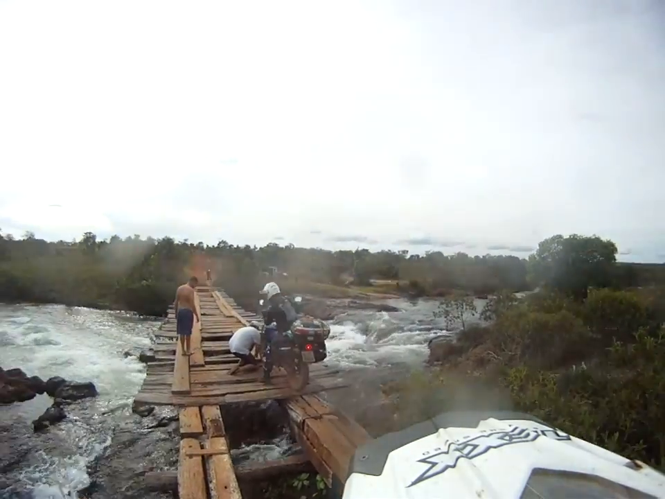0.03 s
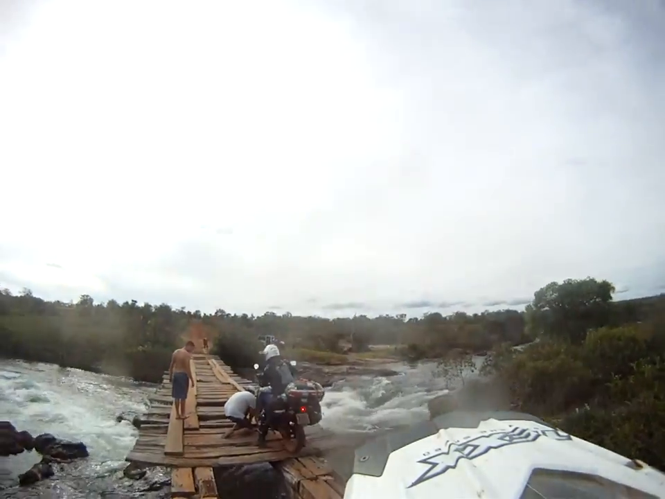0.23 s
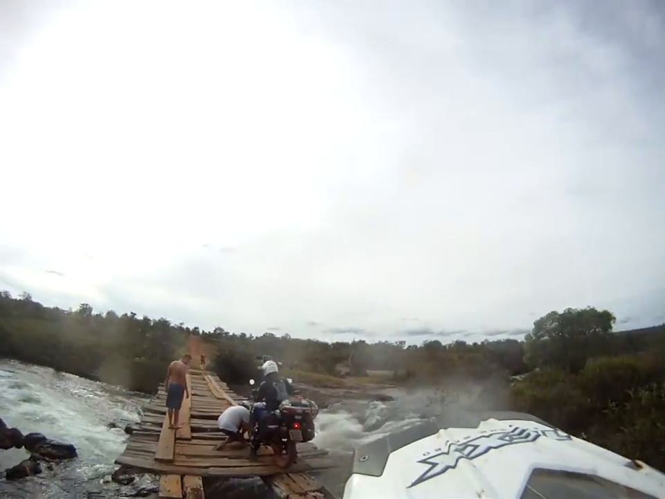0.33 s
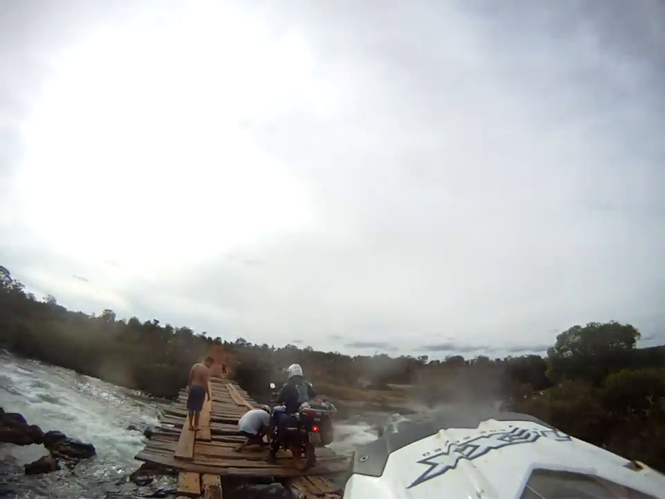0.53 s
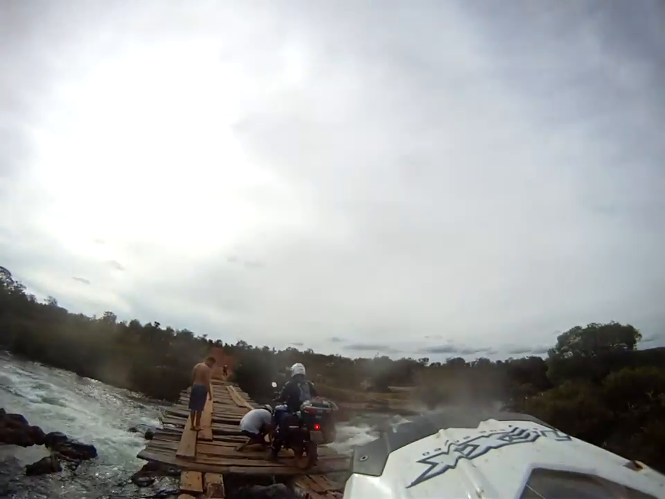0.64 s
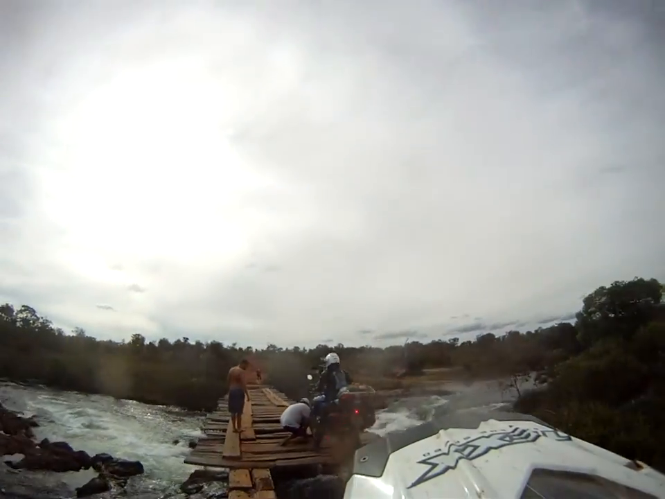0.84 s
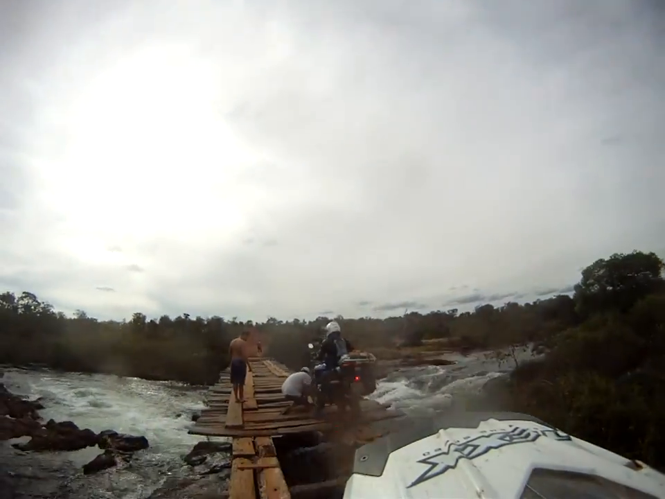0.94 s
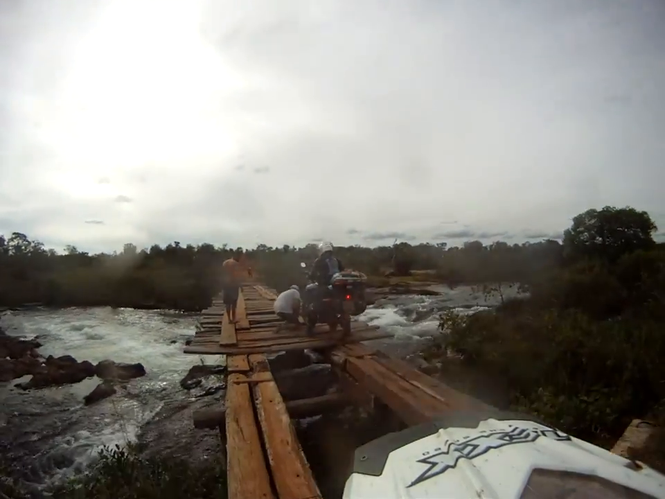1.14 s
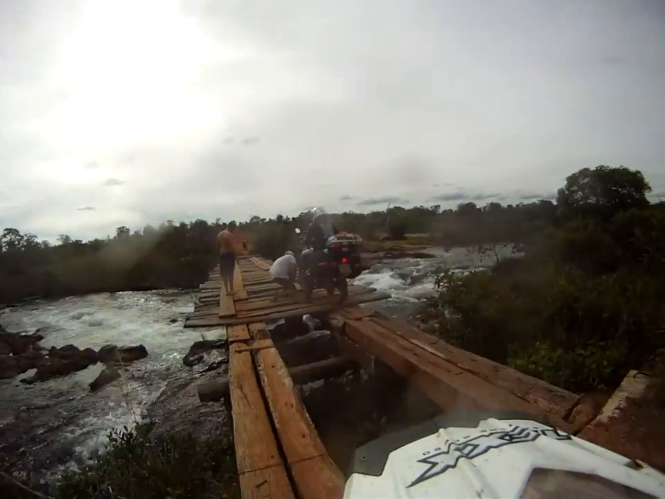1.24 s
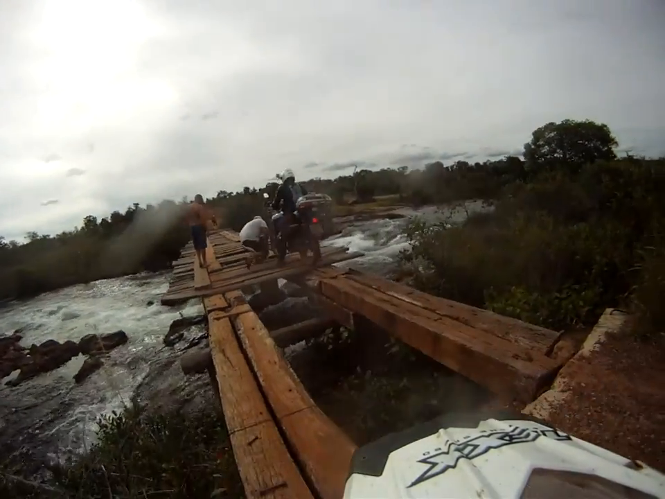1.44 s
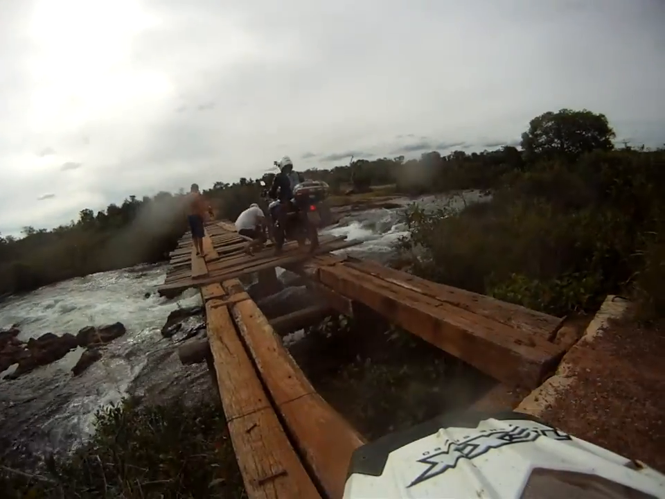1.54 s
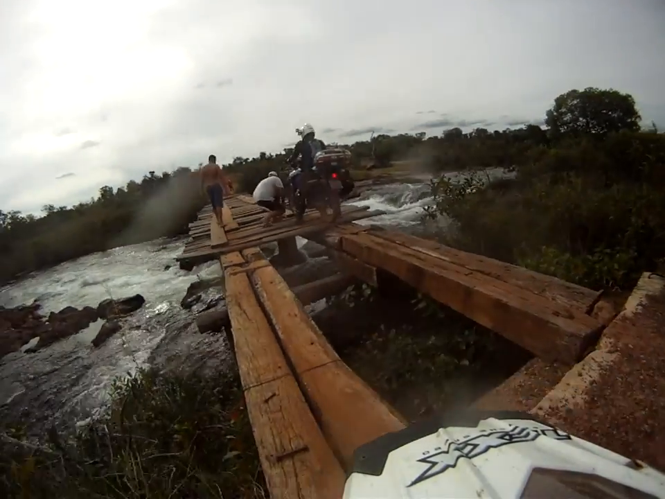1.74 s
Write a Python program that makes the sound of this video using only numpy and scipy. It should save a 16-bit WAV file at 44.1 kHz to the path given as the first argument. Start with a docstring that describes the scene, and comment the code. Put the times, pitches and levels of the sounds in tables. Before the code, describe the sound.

Short, sharp knocks from loose planks on a wooden bridge, heard close through a closed camera case. The heavier blows bring deep thumps, then faint ticks and a soft scuff follow, while a muffled river rushes steadily underneath.

```python
"""On a wooden bridge over river rapids, loose planks knock a few times close to a camera in a closed case.
Each knock clacks in the case and rings the wood; the heavier blows shake the camera's mount.
Small dry ticks and a soft scuff fall in between, over the steady rush of the water, muffled by the case.
The recorder holds each sample at a low rate, which mirrors the sound faintly into the treble."""
import sys
import numpy as np
from scipy.fft import rfft, irfft, next_fast_len
from scipy.io import wavfile
from scipy.ndimage import map_coordinates

SR = 44100
rng = np.random.default_rng(int(sys.argv[2]) if len(sys.argv) > 2 else 0)


def log_audio(samples):
    """Write samples as a 16-bit WAV file to the path given in sys.argv[1]."""
    # one column per channel
    frames = np.atleast_2d(samples).T
    # limit to full scale, then quantise
    limited = np.clip(frames, -1, 1)
    pcm = np.round(limited * 32767).astype(np.int16)
    wavfile.write(sys.argv[1], SR, pcm)


N = 79380


def amp(db):
    """Decibels to gain."""
    return 10 ** (np.asarray(db) / 20)


def unit(x):
    """Scale to rms 1."""
    return x / np.sqrt(np.mean(x ** 2) + 1e-20)


def along(points, hz):
    """Read (Hz, value) points on a log axis."""
    f, v = np.transpose(points)
    return np.interp(np.log(hz + 1), np.log(f + 1), v)


def filtered(x, response):
    """x times a response of frequency."""
    m = next_fast_len(N + 8192)
    return irfft(rfft(x, m) * response(np.fft.rfftfreq(m, 1 / SR)), m)[:N]


def noise(colour):
    """Noise of rms 1 with the given spectrum."""
    return unit(filtered(rng.standard_normal(N), lambda hz: amp(along(colour, hz))))


def wobble(rate):
    """A smooth random curve, rate knots a second."""
    return map_coordinates(rng.standard_normal(int(N * rate / SR) + 4), [np.arange(N) * rate / SR])


def since(s):
    """Seconds since s, zero before it."""
    return np.maximum(np.arange(N) / SR - s, 0)


def struck(s, attack, t60):
    """Envelope of a blow at s: quick rise, exponential fall."""
    t = since(s)
    return (1 - np.exp(-(t / attack) ** 2)) * np.exp(-np.log(1000) * t / t60)


def ring(s, hz, attack, t60):
    """One mode struck at s."""
    return np.sin(2 * np.pi * hz * since(s)) * struck(s, attack, t60)


def river():
    """A steady bed of rushing rapids, heard through the resonances of the case."""
    # muffled water (frequency [Hz], relative level [dB])
    colour = [(100, -32), (160, -7), (205, 5), (270, -12.5), (450, -7), (720, -11.5), (990, -1),
              (1180, -10.5), (1700, -7), (2100, 0.5), (2420, -0.5), (2650, -14.5), (3000, -12),
              (3700, -19.5), (5000, -21), (5700, -26), (6000, -46)]
    return amp(-46) * noise(colour)


def mount_rumble():
    """The mount never stands quite still: a deep rumble that slowly settles."""
    # tremble of the mount (frequency [Hz], relative level [dB])
    colour = [(10, -16), (27, 7.5), (45, -11), (78, -3.5), (105, -18), (135, -29), (300, -98)]
    start_db, fall_db_per_s, swing_db = -37.5, 1.5, 0.5
    level_db = start_db - fall_db_per_s * since(0) + swing_db * wobble(10.6)
    return amp(level_db) * noise(colour)


def scuff():
    """One soft, dull rub that swells and fades."""
    # rubbing noise (frequency [Hz], relative level [dB])
    colour = [(150, -15), (450, 1.5), (680, 6.5), (1200, -12), (2500, -13), (5000, -42)]
    peak_s, width_s = 1.561, 0.039
    swell = np.exp(-0.5 * ((since(0) - peak_s) / width_s) ** 2)
    return amp(-46.5) * noise(colour) * swell


def dry_ticks():
    """Small bright contacts, each a short gritty burst."""
    # light contacts (time [s], level [dB], t60 [s])
    ticks = [(0.052, -43, 0.035), (0.086, -44, 0.035), (0.1953, -38, 0.021), (.212, -42, 0.045),
             (.228, -41.5, 0.031), (.246, -48, 0.099), (.29, -41, .05), (0.3395, -21, 0.01),
             (.402, -44.5, 0.052), (0.4209, -35, 0.022), (0.461, -42.5, 0.025), (0.51, -43, 0.11),
             (0.572, -48, 0.033), (0.6028, -33.5, 0.035), (.618, -43, 0.024), (0.939, -39, 0.033),
             (0.944, -38, 0.022), (1.281, -51, 0.045), (1.303, -47, 0.026), (1.332, -33, 0.024),
             (1.345, -45, 0.046), (1.374, -47, 0.11), (1.601, -37, 0.0091), (1.705, -35.5, .014),
             (1.72, -46, 0.038)]
    # bright tick noise (frequency [Hz], relative level [dB])
    colour = [(500, -38), (2900, -10.5), (3600, 7.5), (4100, -4), (5000, -8), (5900, -18)]
    grain_db, grains_per_s = 4, 900
    grit = unit(noise(colour) * amp(grain_db * wobble(grains_per_s)))
    return grit * sum(amp(db) * struck(s, attack=0.00036, t60=t60) for s, db, t60 in ticks)


def mount_jolts():
    """Each jolt sets the mount swaying, with a low thud just behind."""
    # jolts of the mount (time [s], thud level [dB], sway level [dB])
    jolts = [(0.073, -34.5, -56.5), (.178, -30.5, -52), (0.343, -27, -58), (.438, -25.5, -63),
             (0.6304, -20.5, -20), (0.702, -23.5, -19), (.893, -22, -34), (1.144, -36.5, -35.5),
             (1.255, -30.5, -45), (1.494, -42, -38)]
    # modes of the thud (frequency [Hz], relative level [dB], t60 [s])
    modes = [(67.3, 1, 0.24), (86.4, -3.5, 0.23), (212.3, -13.5, 0.23)]
    attack_s, thud_lag_s = 0.0074, 0.0053
    out = np.zeros(N)
    for s, thud_db, sway_db in jolts:
        out += sum(amp(thud_db + db) * ring(s + thud_lag_s, hz, attack_s, t60) for hz, db, t60 in modes)
        out += amp(sway_db) * ring(s, hz=27.97, attack=attack_s, t60=0.62)
    return out


def case_clack(s, hz):
    """The case answers a contact at time s with a few cycles of one resonance under a smooth swell."""
    t, duration_s = since(s), 0.003
    swell = np.sin(np.pi * np.minimum(t / duration_s, 1)) ** 2
    return np.sin(2 * np.pi * hz * t) * swell


def plank_knocks():
    """Loose planks clack in the case, then ring; bending waves bring the low modes after the high ones."""
    # blows of the planks (time [s], clack level [dB], low level [dB], mid level [dB], high level [dB],
    # ring length [factor], lag scale of the low modes [s])
    knocks = [(0.1801, -62, -35.5, -81, -64, 1.8, 0.00044), (0.2199, -20, -56, -44, -53, 0.73, 0.00019),
              (.3391, -2.5, -18.5, -9, -12.5, 0.95, 0.000062), (0.426, -28, -33, -19, -26, 0.86, 0.00011),
              (0.6041, -18, -31, -16, -19, 0.73, 0.0006), (0.6284, -27, -25.5, -25.5, -41, 1.19, 0.00076),
              (.7005, -11, -22, -24, -20.5, 1.07, 0.0029), (.8902, -30.5, -25, -29.5, -36.5, 1.17, 0.0015),
              (1.139, -43, -46, -41, -54, 0.74, 0.00044), (1.66, -33.5, -53, -33.5, -37, 0.56, 0.00035),
              (1.693, -37, -62, -37.5, -37, 1.16, 0.00024)]
    # plank modes (frequency [Hz], relative level [dB], base t60 [s])
    modes = [(356, -13, 0.048), (443.7, -2.5, 0.044), (642, -1.5, 0.0335), (774, -8.5, .03),
             (956, 1.5, 0.022), (1177, -6.5, 0.012), (1564, -9, 0.054), (1786, -2.5, 0.02),
             (1997, -0.5, 0.02), (2323, -2.5, 0.026), (3123, -13, 0.024), (3370, -14.5, 0.012)]
    # contact noise (frequency [Hz], relative level [dB])
    crack_colour = [(100, -37), (350, -18), (900, 13.5), (1300, -10), (2000, 10.5), (2450, -10), (2700, -3),
                    (3100, -27), (4000, -17), (5900, -36)]
    # after-ring of the deck (frequency [Hz], relative level [dB])
    tail_colour = [(120, -11.5), (260, -4), (420, -0.5), (800, -6.5), (1400, -16.5), (2400, -19),
                   (4000, -37)]
    low_hz, mid_hz, high_hz = 556, 996, 1730
    attack_s, ring_delay_s, scatter_db = 0.00065, 0.0022, 2
    crack, tail = noise(crack_colour), noise(tail_colour)
    out = np.zeros(N)
    for s, clack_db, low_db, mid_db, high_db, length, lag in knocks:
        force = [(low_hz, low_db), (mid_hz, mid_db), (high_hz, high_db)]
        ring_start = s + ring_delay_s
        for hz, db, t60 in modes:
            arrival = ring_start + lag * max(np.sqrt(high_hz / hz) - 1, 0)
            level_db = db + along(force, hz) + scatter_db * rng.normal()
            out += amp(level_db) * ring(arrival, hz, attack_s, t60 * length)
        out += amp(clack_db) * case_clack(s, hz=2031)
        out += amp(mid_db - 1) * case_clack(s, hz=858)
        out += amp(high_db - 3) * crack * struck(s, attack_s, t60=0.019 * length)
        out += amp(low_db - 12.5) * tail * struck(ring_start + lag, attack_s, t60=0.14 * length ** 2)
    return out


def scene():
    """The knocks and small contacts over the bed of river and rumble, in mono."""
    return (plank_knocks() + mount_jolts() + dry_ticks() + scuff() + river() + mount_rumble())[None]


def record(dry):
    """Sample and hold mirrors the sound about the hold rate; a low-pass ends the band."""
    # treble response of the recorder (frequency [Hz], gain [dB])
    treble = [(12000, -1), (14300, 1), (15200, -4.5), (15700, -2)]
    hold_hz, top_hz = 12000, 15700
    base = filtered(dry[0], lambda hz: hz < hold_hz / 2)
    images = base * 2 * np.cos(2 * np.pi * hold_hz * since(0))
    # the hold fades the images to nothing at its own rate
    mirror = filtered(images, lambda hz: (hold_hz - hz) / np.maximum(hz, hold_hz / 2))
    return filtered(base + mirror, lambda hz: amp(along(treble, hz)) * (hz < top_hz))[None]


dry = scene()
out = record(dry)
log_audio(out)
```